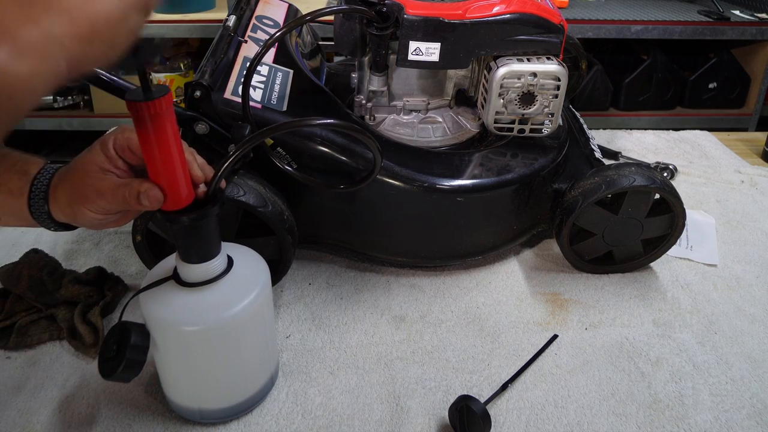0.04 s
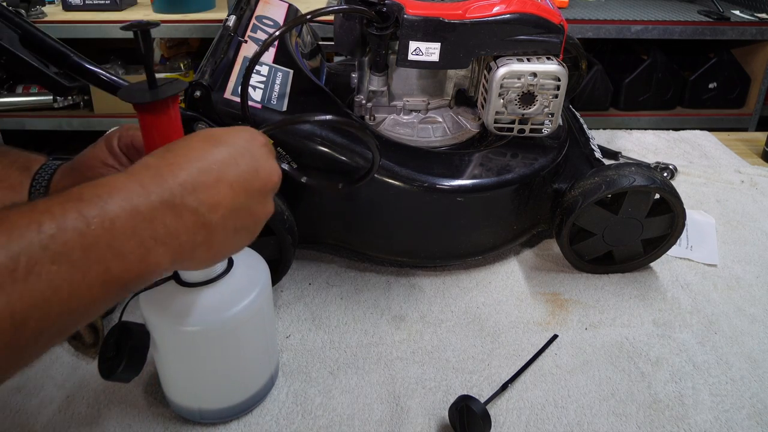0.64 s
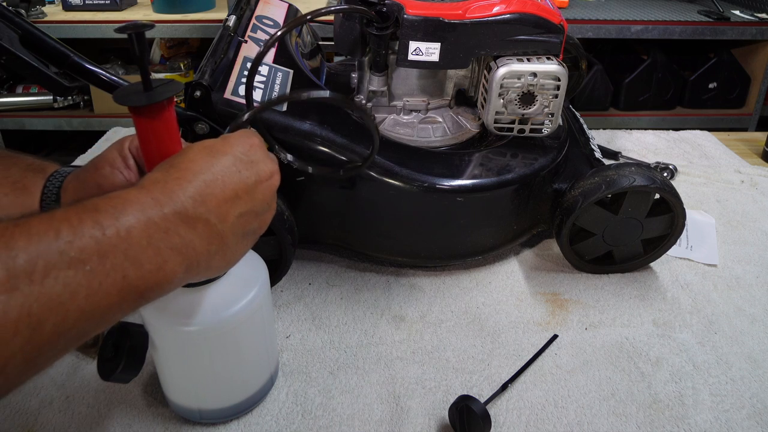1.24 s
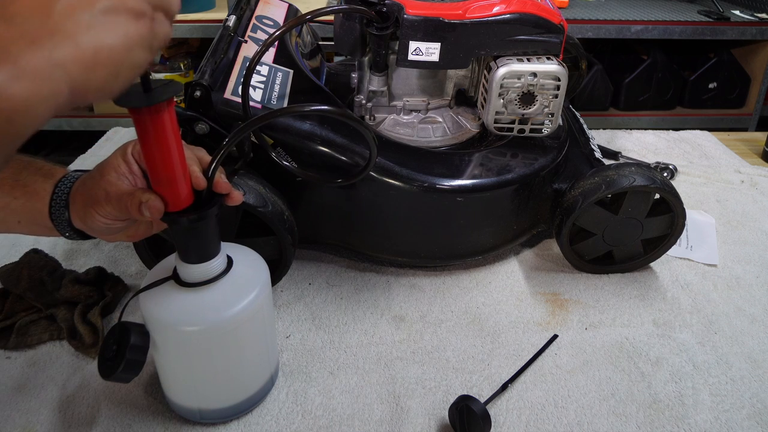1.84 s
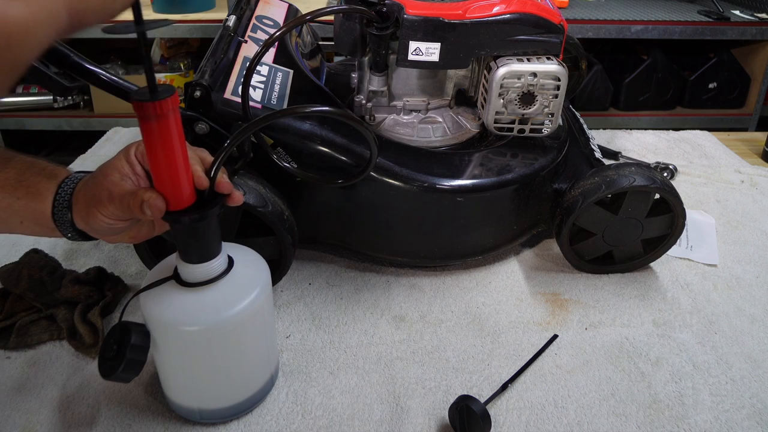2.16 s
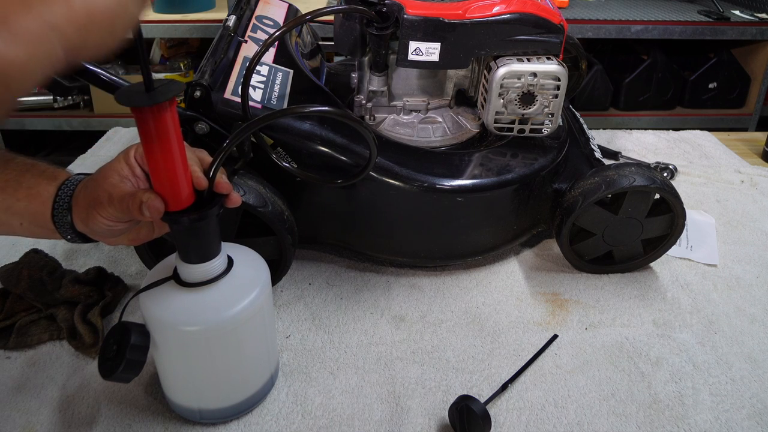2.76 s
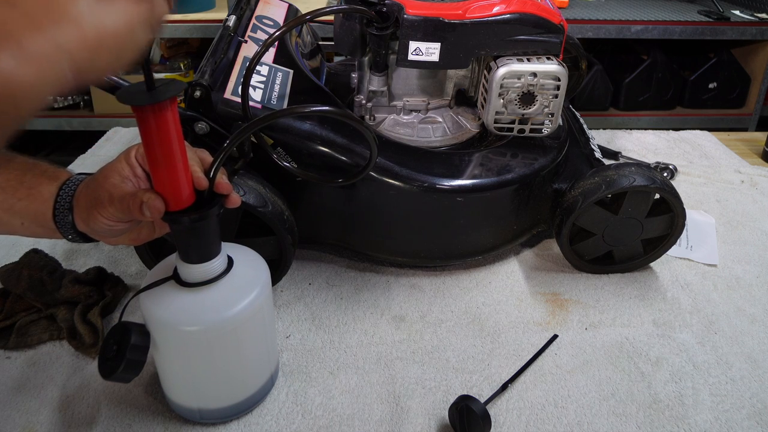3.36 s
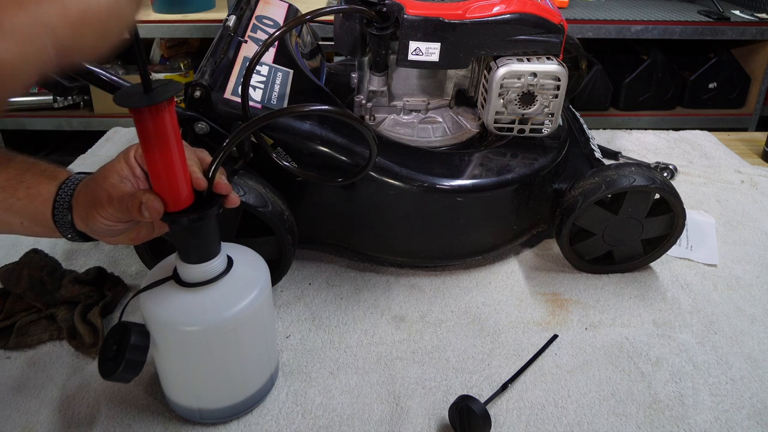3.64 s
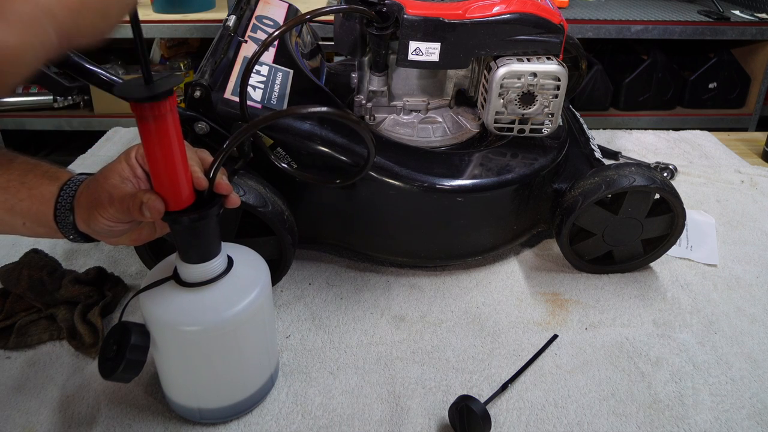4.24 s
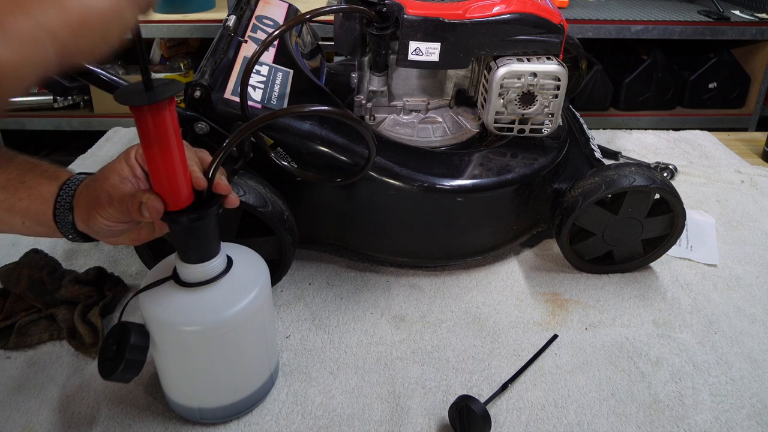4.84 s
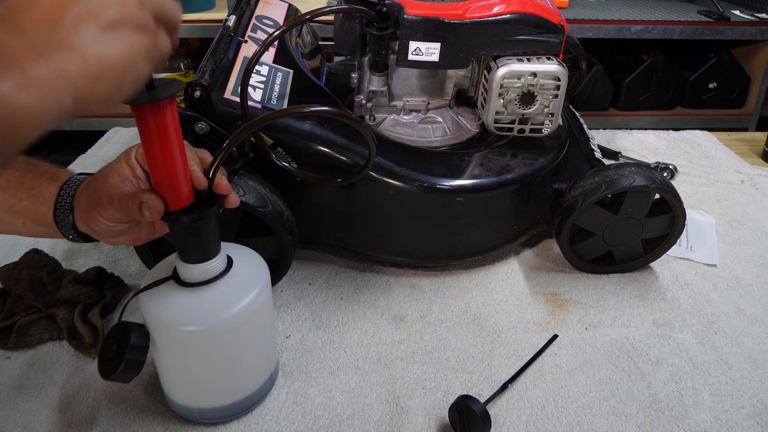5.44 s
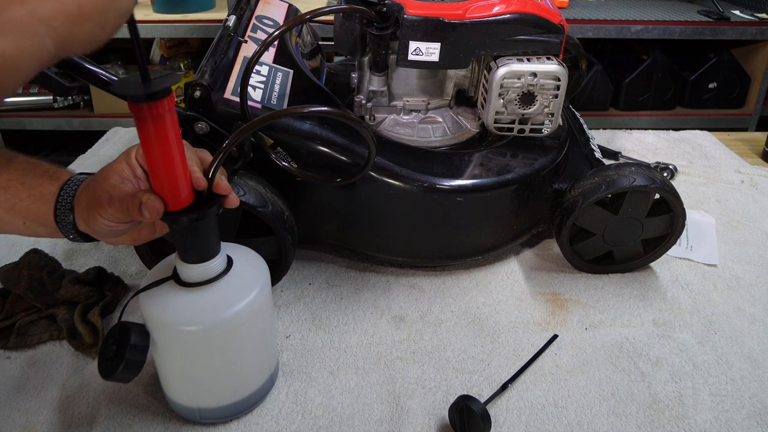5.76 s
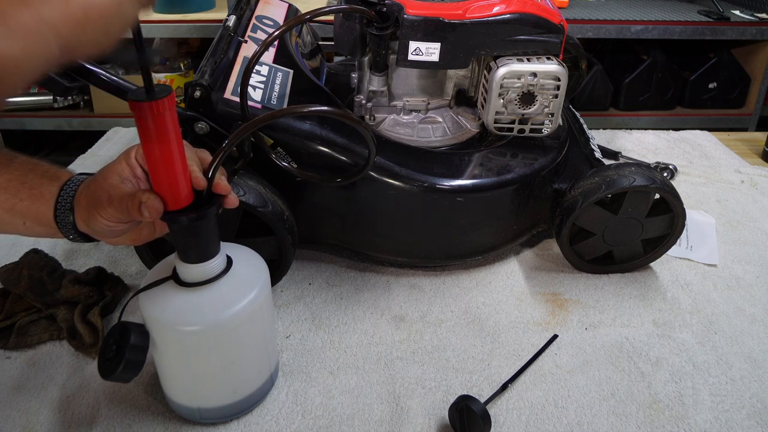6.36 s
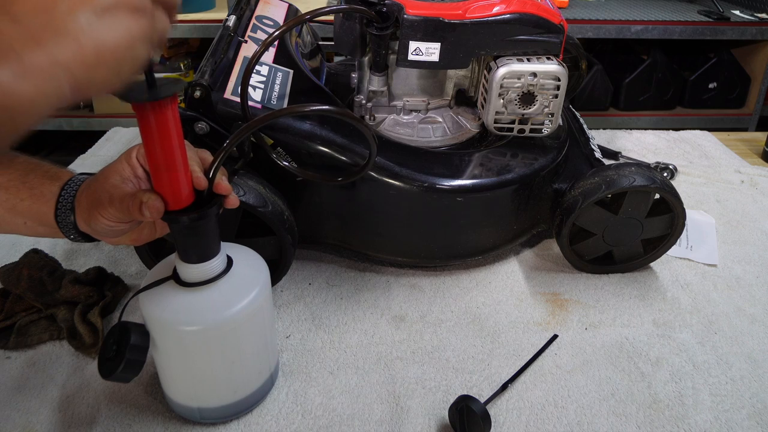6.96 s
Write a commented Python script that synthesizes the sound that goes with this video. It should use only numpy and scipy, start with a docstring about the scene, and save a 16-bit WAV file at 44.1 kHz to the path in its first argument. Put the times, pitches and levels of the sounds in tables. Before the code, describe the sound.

A hose gives a short, rubbery creak, then a plastic hand pump starts working close to the microphone, about one stroke a second. Each pull opens with a valve click and a rush of air, each push has a breathy whistle, and the piston knocks at both ends. Halfway through, oil gulps into the hose, and a thin suction hiss and tiny squeaks join the pumping in a small workshop.

```python
"""A plastic hand vacuum pump, stroked about once a second, draws oil out of a mower in a small workshop.
Each upstroke opens with a valve click and a rush of air; each downstroke whistles past the seal.
The piston knocks at both ends, ringing pump, bottle and bench. The hose creaks once as it is seated,
then gulps as the oil arrives; from then on the vacuum keeps up a thin hiss."""
import sys
import numpy as np
from scipy import signal
from scipy.fft import rfft, irfft, next_fast_len
from scipy.io import wavfile
from scipy.ndimage import map_coordinates

SR = 44100
rng = np.random.default_rng(int(sys.argv[2]) if len(sys.argv) > 2 else 0)


def wav_out(sig):
    """Save sig, one row per channel (or a flat mono array), as 16-bit PCM at SR to the path in sys.argv[1]."""
    wavfile.write(sys.argv[1], SR, np.round(np.clip(np.atleast_2d(sig).T, -1, 1) * 32767).astype(np.int16))


N = 313110
TIME = np.arange(N) / SR
AGE = TIME[:SR // 3]   # time since a blow
OIL_ARRIVES_S = 3.746


def from_db(db):
    """Decibels to gain."""
    return 10 ** (np.asarray(db) / 20)


def unit_rms(x):
    """Scale to unit power."""
    return x / np.sqrt(np.mean(np.abs(x) ** 2) + 1e-20)


def add(track, start_s, sound):
    """Mix a short sound into the track."""
    start = max(round(start_s * SR), 0)
    track[start:start + len(sound)] += sound[:max(N - start, 0)]


def butter(x, hz, kind, order=2):
    """Causal Butterworth filter."""
    return signal.sosfilt(signal.butter(order, np.clip(hz, 5, .45 * SR), kind, fs=SR, output="sos"), x)


def filtered_noise(hz, kind="band"):
    """Unit-power noise through a filter."""
    return unit_rms(butter(rng.standard_normal(N), hz, kind))


def coloured_noise(spectrum):
    """Unit-power noise with a given spectral shape."""
    hz, db = np.transpose(spectrum)
    size = next_fast_len(N)
    bins_hz = np.maximum(np.fft.rfftfreq(size, 1 / SR), 1)
    gain = from_db(np.interp(np.log(bins_hz), np.log(hz), db))
    return unit_rms(irfft(rfft(rng.standard_normal(size)) * gain, size)[:N])


def flutter(rate_hz, depth_db):
    """A factor wavering randomly around 1."""
    return from_db(depth_db * filtered_noise(rate_hz, "low"))


def air_tone(hz, width_hz):
    """Turbulence held in a narrow, movable resonance."""
    swirl = butter(rng.standard_normal(N) + 1j * rng.standard_normal(N), width_hz / 2, "low")
    phase = 2 * np.pi * np.cumsum(hz + np.zeros(N)) / SR
    return unit_rms(np.real(swirl * np.exp(1j * phase)))


def ring(hz, t60_s, delay_s=0):
    """One struck mode."""
    age = np.maximum(AGE - delay_s, 0)
    return np.sin(2 * np.pi * hz * age) * from_db(-60 * age / t60_s)


def nearest(rows):
    """Per sample, the columns of the nearest event; rows begin with start_s, end_s."""
    rows = np.array(rows)
    midpoints_s = (rows[:-1, 1] + rows[1:, 0]) / 2
    return rows[np.searchsorted(midpoints_s, TIME)].T


def gate(start_s, end_s, rise_s, fall_s):
    """Gain that swells before the start, holds, and dies away after the end."""
    early = np.maximum(start_s - TIME, 0) / rise_s
    late = np.maximum(TIME - end_s, 0) / fall_s
    return np.exp(-np.minimum(early + late, 20))


# background spectrum: freq_hz, level_db
BACKGROUND_SPECTRUM = [(12, -27), (20, -16), (76, -7), (129, -11.5), (161, -6.5), (202, -5), (232, -3.5),
                       (372, -10.5), (1100, -15.5), (1200, -17), (1720, -18.5), (3640, -8.5), (5380, -16),
                       (7950, -31.5), (15500, -34)]

def background(level_db=-51):
    """Steady hiss over a low rumble."""
    return from_db(level_db) * coloured_noise(BACKGROUND_SPECTRUM)


# reflections off bench and mower deck: delay_s, level_db
REFLECTIONS = [(.0008, -39.5), (.0041, -26.5)]

def workshop(x, t60_s=0.25, tail_db=-13):
    """Two close reflections, then the short tail of a cluttered room."""
    tail = rng.standard_normal(len(AGE)) * from_db(-60 * AGE / t60_s) * (AGE > .003)
    tail = butter(tail, 9400, "low", order=1)
    response = from_db(tail_db) * tail / np.sqrt(np.sum(tail ** 2))
    for delay_s, db in REFLECTIONS:
        add(response, delay_s, from_db([db]))
    return signal.fftconvolve(x, response)[:N]


# jet resonances: freq_hz, width_hz, level_db
JET_RESONANCES = [(1280, 195, -12), (2452, 210, -7), (5550, 170, -11.5), (6520, 140, -15),
                  (7530, 160, -11.5), (8500, 130, -20), (9340, 110, -17.5)]
# jet noise: freq_hz, level_db
SUCTION_SPECTRUM = [(80, -5.5), (250, 3.5), (700, -5), (1900, 0.5), (3500, 0.5), (7500, -2.5),
                    (10000, -10.5), (13000, -16), (16000, -25)]

def suction(level_db=-48, swing_db=4.5, leak_s=0.12, fill_s=0.14):
    """With the oil comes a sputtering jet in the hose; upstrokes deepen the vacuum, which leaks away."""
    start_s, end_s, *_ = nearest(UPSTROKES)
    retained = np.exp(-1 / (leak_s * SR))
    vacuum = signal.lfilter([1 - retained], [1, -retained], (TIME > start_s) & (TIME < end_s))
    filled = 1 / (1 + np.exp((OIL_ARRIVES_S - TIME) / fill_s))
    jet = sum(from_db(db) * air_tone(hz, width_hz) for hz, width_hz, db in JET_RESONANCES)
    jet += from_db(-2.5) * coloured_noise(SUCTION_SPECTRUM)
    jet *= flutter(rate_hz=62, depth_db=3)
    steady_note = from_db(-8) * air_tone(1192, width_hz=28)
    return filled * from_db(level_db + swing_db * vacuum) * (jet + steady_note)


# hose modes: freq_hz, level_db, t60_s
HOSE_MODES = [(323, -8, 0.051), (530, -6, 0.0068), (900, -8, 0.0098), (1317, -9, 0.017), (1790, -8.5, 0.02),
              (1900, -7.5, 0.0067)]

def hose_ring(scatter_db):
    """The hose's modes, struck in alternating polarity, each with a random strength."""
    return sum((-1) ** k * from_db(db + rng.normal(0, scatter_db)) * ring(hz, t60_s)
               for k, (hz, db, t60_s) in enumerate(HOSE_MODES))


# hose slips in the filler neck: start_s
HOSE_SLIPS = [0.8539, 0.9118, 0.961, 0.979, 1.0094, 1.0243, 1.0362, 1.053, 1.078, 1.0992, 1.1195]

def creak(peak_s=1.011, peak_db=-24.5, rise_db_per_s=44, fall_db_per_s=106, tick_s=0.0032):
    """Each slip rings the hose and gives a dry, rubbery tick; they swell and fade with the pressure."""
    rings, ticks = np.zeros(N), np.zeros(N)
    for start_s in HOSE_SLIPS:
        db = peak_db - max(rise_db_per_s * (peak_s - start_s), fall_db_per_s * (start_s - peak_s))
        add(rings, start_s, from_db(db - 2) * hose_ring(scatter_db=1))
        add(ticks, start_s + 0.00098, from_db(db) * np.exp(-AGE / tick_s))
    dry_edge = from_db(-17) * filtered_noise([5700, 8400])
    rub = from_db(-11) * filtered_noise([1620, 2220])
    return butter(rings, 170, "high") + ticks * (dry_edge + rub)


def breakaways():
    """Downstrokes that break loose against the vacuum: start_s, air_db."""
    return [(start_s, air_db) for start_s, *_, air_db, _ in DOWNSTROKES if start_s > OIL_ARRIVES_S]


# air pockets in the hose: start_s, level_db, bubble_hz
AIR_POCKETS = [(3.707, -20.5, 1943), (3.739, -13.5, 1390), (3.786, -25, 790), (3.88, -27.5, 2020),
               (3.932, -20.5, 1004), (4.043, -22.5, 1440), (4.156, -28, 1475), (4.222, -19, 1944),
               (5.062, -33, 1870), (5.499, -26, 1883), (6.039, -27.5, 1749), (6.101, -28.5, 1494),
               (6.23, -27, 1602), (6.9985, -25.5, 1484)]

def gulps(bubble_t60_s=0.023, swell_s=0.00048, rise_per_s=14, breakaway_db=-28.5, breakaway_hz=820):
    """An air pocket jolts the hose and adds a rising bubble tone; each breakaway gives a low gulp."""
    out = np.zeros(N)
    envelope = (1 - np.exp(-AGE / swell_s)) * from_db(-60 * AGE / bubble_t60_s)
    envelope /= envelope.max()
    low_gulps = [(start_s + 0.00304, breakaway_db, breakaway_hz) for start_s, _ in breakaways()]
    for start_s, db, hz in AIR_POCKETS + low_gulps:
        bubble = envelope * np.sin(2 * np.pi * hz * (AGE + rise_per_s * AGE ** 2 / 2))
        add(out, start_s, from_db(db + 0.5) * hose_ring(scatter_db=2) + from_db(db - 2) * bubble)
    return butter(out, 165, "high")


# seal friction: freq_hz, level_db
DRAG_SPECTRUM = [(100, -12), (600, -0.5), (1000, 5), (1700, -4), (3200, 4), (4800, -2), (6200, -9),
                 (7000, -12), (10000, -24.5), (16000, -34)]

def seal_drag(level_db=-48.5):
    """The rubber seal rubs along the plastic barrel as the first upstroke gets going."""
    envelope = gate(start_s=1.69, end_s=1.89, rise_s=0.067, fall_s=0.21)
    return from_db(level_db) * envelope * coloured_noise(DRAG_SPECTRUM)


# squeals on the later upstrokes: start_s, end_s, pitch_hz, bend_hz, level_db
VALVE_SQUEALS = [(4.152, 4.2, 10820, -1750, -39), (4.912, 4.942, 10800, -1300, -39.5),
                 (5.577, 5.638, 10850, 905, -40), (6.378, 6.46, 10700, -1400, -44),
                 (7.062, 7.1, 11400, 600, -48)]

def squeals(bend_power=4.4):
    """A thin, raspy edge tone at the outlet valve holds its pitch, then bends away."""
    start_s, end_s, pitch_hz, bend_hz, level_db = nearest(VALVE_SQUEALS)
    progress = np.clip((TIME - start_s) / (end_s - start_s), 0, 1)
    hz = pitch_hz + bend_hz * progress ** bend_power
    tone = air_tone(hz, width_hz=110) + from_db(-0.5) * air_tone(hz, width_hz=570)
    return from_db(level_db) * gate(start_s, end_s, rise_s=0.0031, fall_s=0.008) * tone


# stray leaks past the seal: start_s, level_db, length_s
SEAL_LEAKS = [(0.1652, -24, 0.0022), (0.172, -21.5, 0.0015), (0.179, -33, 0.028), (2.3798, -26, 0.0016),
              (2.3822, -20.5, 0.0033), (2.392, -32, 0.013), (4.677, -37, 0.012), (4.981, -37.5, 0.0081),
              (5.433, -34.5, 0.0094)]
# escaping air: freq_hz, level_db
SPIT_SPECTRUM = [(100, -9.5), (400, -1), (1000, -2), (2500, -1), (4000, -5.5), (7000, 2), (9000, -8),
                 (12000, -24.5), (16000, -27)]

def spits(landing_s=0.003, breakaway_s=0.004, tail_s=0.0037):
    """Short, hard bursts of air pass the seal at leaks, downstroke landings and breakaways."""
    landings = [(end_s, blow_db + 11.5, landing_s) for _, end_s, *_, blow_db in DOWNSTROKES]
    breaks = [(start_s, air_db + 10, breakaway_s) for start_s, air_db in breakaways()]
    envelope = np.zeros(N)
    for start_s, db, length_s in SEAL_LEAKS + landings + breaks:
        add(envelope, start_s, from_db(db) * np.exp(-np.maximum(AGE - length_s, 0) / tail_s))
    return envelope * coloured_noise(SPIT_SPECTRUM)


# valve seat modes: freq_hz, level_db, t60_s
SEAT_MODES = [(239, -25.5, 0.013), (3340, -27, 0.032), (4130, -20.5, 0.0096), (5320, -13.5, 0.0065),
              (7360, -47, 0.0043), (8400, -15, 0.0082)]
# flap closings between strokes: start_s, level_db
FLAP_CLOSINGS = [(0.0326, -13), (2.2162, -26.5), (2.9364, -12), (3.6194, -10), (4.282, -11.5), (5.027, -14),
                 (5.336, -19), (5.7903, -13), (6.5436, -12.5)]

def valve_clicks():
    """The flap snaps and rings its seat, on closing and as each upstroke opens it."""
    snap = butter(signal.unit_impulse(len(AGE)), [4200, 8600], "band", order=1)
    snap = butter(snap, 12800, "low", order=4)
    seat = sum(from_db(db) * ring(hz, t60_s) for hz, db, t60_s in SEAT_MODES)
    click = seat - snap / np.abs(snap).max()
    openings = [(start_s, click_db) for start_s, *_, click_db, _ in UPSTROKES]
    out = np.zeros(N)
    for start_s, db in FLAP_CLOSINGS + openings:
        add(out, start_s, from_db(db) * click)
    return out


def blows(firm_db=-38, hardening=0.71):
    """Stroke ends, hard at the top and dull at the bottom: start_s, boom_db, thump_db, knock_db."""
    top = [(end_s, db - 16, db, db + 6.5 + hardening * (db - firm_db)) for _, end_s, *_, db in UPSTROKES]
    bottom = [(end_s, db - 11.5, db, db - 21) for _, end_s, *_, db in DOWNSTROKES]
    return top + bottom


# hand brushes the bottle while seating the hose: start_s, thump_db
HAND_BUMPS = [(0.748, -52), (1.423, -68)]

def bottle_shudder(onset_s=0.0025, decay_s=0.016, gain=1.262):
    """The half-soft bottle shakes irregularly after each blow or bump."""
    pulse = (1 - np.exp(-AGE / onset_s)) * np.exp(-AGE / decay_s)
    thumps = [(start_s, thump_db) for start_s, _, thump_db, _ in blows()]
    envelope = np.zeros(N)
    for start_s, db in thumps + HAND_BUMPS:
        add(envelope, start_s, from_db(db) * pulse)
    return gain * envelope * filtered_noise([130, 260])


# pump, bottle and bench modes: freq_hz, level_db, t60_s
BODY_MODES = [(95.3, 9, 0.29), (116.5, 8.5, 0.17), (175.9, 8.5, 0.11), (229, 5, 0.081), (280, 0.5, 0.071),
              (345, 11.5, 0.041), (534.5, 13, 0.012), (805, 7, 0.019), (1330, 5.5, 0.0095)]

def piston_knocks(boom_hz=110, thump_hz=230, knock_hz=700, dispersion=1.515, scatter_db=3):
    """The piston hits its stop; lower modes start later, so the thump falls in pitch."""
    out = np.zeros(N)
    for start_s, *bands_db in blows():
        for hz, mode_db, t60_s in BODY_MODES:
            blow_db = np.interp(np.log(hz), np.log([boom_hz, thump_hz, knock_hz]), bands_db)
            lag_s = max(0.01163 * (200 / hz) ** dispersion - 0.001, 0)
            mode = butter(ring(hz, t60_s, lag_s), hz / 2, "high")
            add(out, start_s, from_db(blow_db + mode_db + rng.normal(0, scatter_db)) * mode)
    return out


def hand_speed(peak_s, gather_s, slowing_stretch=1.1):
    """Bell curve, 1 at its peak: the hand loses speed a little more slowly than it gathers it."""
    width_s = np.where(TIME < peak_s, gather_s, gather_s * slowing_stretch)
    return np.maximum(np.exp(-.5 * ((TIME - peak_s) / width_s) ** 2), .2)


def barrel_comb(x, spacing_hz, depth):
    """A reflection inside the barrel combs the noise, with crests on multiples of spacing_hz."""
    echo = map_coordinates(x, [np.arange(N) - SR / spacing_hz], order=3)
    return unit_rms(x + depth * echo)


# seal whistle partials: pitch_ratio, width_hz, level_db
WHISTLE_PARTIALS = [(.5, 530, -10.5), (1, 175, 1), (1.5, 690, -15.5), (2, 800, -16.5)]
# air past the seal: freq_hz, level_db
DOWN_SPECTRUM = [(80, -8), (300, -3.5), (1500, 0.5), (2800, 0.5), (4500, 1.5), (6500, 3), (8500, 0),
                 (10000, -11.5), (13000, -11.5), (16000, -16)]
# plunger pushed down: start_s, end_s, peak_s, gather_s, peak_hz, whistle_db, air_db, blow_db
DOWNSTROKES = [(0.067, 0.212, 0.174, .08, 4674, -36, -35.5, -54),
               (2.295, 2.414, 2.41, .112, 6700, -29.5, -32, -32),
               (3.031, 3.13, 3.096, 0.079, 5897, -29.5, -36.5, -35),
               (3.696, 3.798, 3.78, .095, 5804, -34.5, -33.5, -35.5),
               (4.352, 4.515, 4.446, 0.078, 4764, -39.5, -35, -40),
               (5.109, 5.271, 5.2, .1, 4770, -43, -34, -39),
               (5.874, 6.038, 5.975, 0.15, 4380, -43.5, -35.5, -40),
               (6.634, 6.745, 6.7, 0.077, 5180, -38.5, -32.5, -40.5)]

def downstrokes(whistle_lag_s=0.025, whistle_power=3, air_power=1.3):
    """Air squeezes past the seal; its breathy whistle follows the speed, hoarser against the vacuum."""
    start_s, end_s, peak_s, gather_s, peak_hz, whistle_db, air_db, _ = nearest(DOWNSTROKES)
    speed = hand_speed(peak_s, gather_s)
    hz = peak_hz * speed * flutter(rate_hz=44, depth_db=0.18)
    whistle = sum(from_db(db) * air_tone(ratio * hz, width) for ratio, width, db in WHISTLE_PARTIALS)
    whistle += from_db(-9) * (start_s > OIL_ARRIVES_S) * air_tone(2 * hz, width_hz=320)
    whistle *= from_db(whistle_db) * speed ** whistle_power
    whistle *= gate(start_s + whistle_lag_s, end_s, rise_s=0.014, fall_s=0.0022)
    rush = barrel_comb(coloured_noise(DOWN_SPECTRUM), hz / 2, depth=0.3)
    rush *= flutter(rate_hz=84, depth_db=2.5)
    rush *= from_db(air_db - 5) * speed ** air_power * gate(start_s, end_s, rise_s=0.039, fall_s=0.032)
    return whistle + rush


# outlet hum partials: pitch_ratio, width_hz, level_db
OUTLET_PARTIALS = [(.55, 180, -14), (1, 190, -6.5), (1.849, 220, -12), (2.151, 220, -9.5),
                   (2.601, 320, -13)]
# air through the outlet: freq_hz, level_db
UP_SPECTRUM = [(80, -15), (300, -11), (1200, -1), (2000, -6), (3000, 1), (4500, -1.5), (6500, 2.5),
               (8000, -3.5), (10000, -10), (13800, -13), (15300, -18)]
# plunger drawn up: start_s, end_s, peak_s, peak_hz, air_db, click_db, blow_db
UPSTROKES = [(1.9205, 2.119, 2.17, 2800, -39, -5.5, -40), (2.6352, 2.867, 2.81, 3022, -38.5, -5, -37),
             (3.3065, 3.5353, 3.51, 3130, -38, -9, -34.5), (3.9703, 4.218, 4.105, 2790, -39, -10.5, -41),
             (4.7143, 4.985, 4.89, 2896, -41.5, -8, -49), (5.479, 5.708, 5.68, 2988, -36, -8.5, -33.5),
             (6.22, 6.476, 6.34, 2830, -39.5, -7, -38), (6.9232, 7.17, 7.08, 3010, -40.5, -7.5, -38)]

def upstrokes(air_power=1.63, fizz_power=9):
    """Air leaves by the outlet; with speed its resonance climbs, a high sizzle sinks and fizz grows."""
    start_s, end_s, peak_s, peak_hz, air_db, *_ = nearest(UPSTROKES)
    speed = hand_speed(peak_s, gather_s=0.28)
    hz = peak_hz * speed
    hum = sum(from_db(db) * air_tone(ratio * hz, width) for ratio, width, db in OUTLET_PARTIALS)
    sizzle_hz = np.clip(15100 * (2750 / hz) ** 0.49, 12000, 16500)
    sizzle = from_db(-16) * air_tone(sizzle_hz, width_hz=920)
    undertone = from_db(-11) * air_tone(sizzle_hz / 2, width_hz=330)
    fizz = from_db(-11) * (hz / 3000) ** fizz_power * filtered_noise([7500, 13000])
    rush = barrel_comb(coloured_noise(UP_SPECTRUM), hz / 2, depth=0.22)
    air = from_db(-1.5) * rush + from_db(-0.5) * hum + sizzle + undertone + fizz
    return from_db(air_db) * speed ** air_power * gate(start_s, end_s, rise_s=0.011, fall_s=0.015) * air


def scene():
    """The pump close by, over a steady hiss; both channels alike."""
    air = seal_drag() + upstrokes() + downstrokes() + squeals() + suction() + spits()
    pump = air + valve_clicks() + piston_knocks() + bottle_shudder() + creak() + gulps()
    mono = pump + workshop(pump) + background()
    return np.stack([mono, mono])


def record(dry):
    """Steep low-pass at 15.9 kHz."""
    return signal.sosfilt(signal.ellip(10, .1, 80, 15900, fs=SR, output="sos"), dry)


dry = scene()
out = record(dry)
wav_out(out)
```